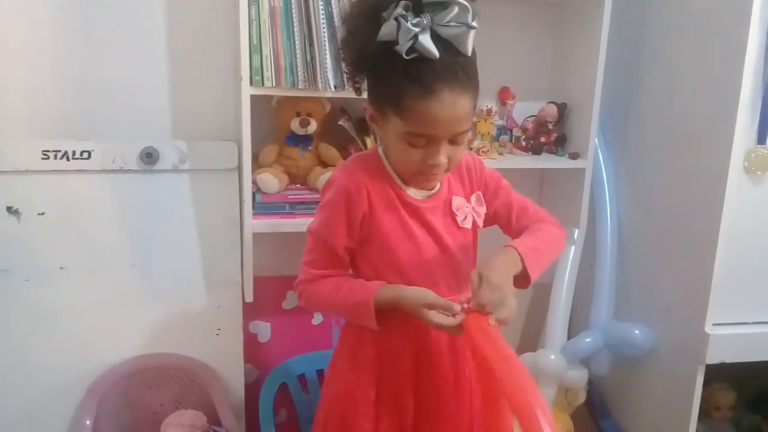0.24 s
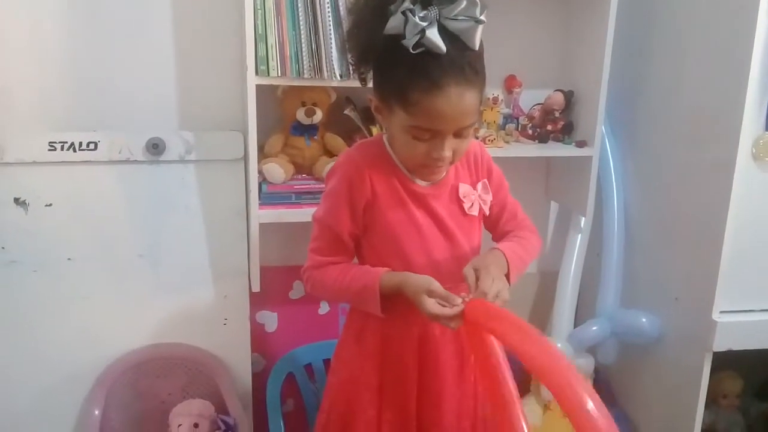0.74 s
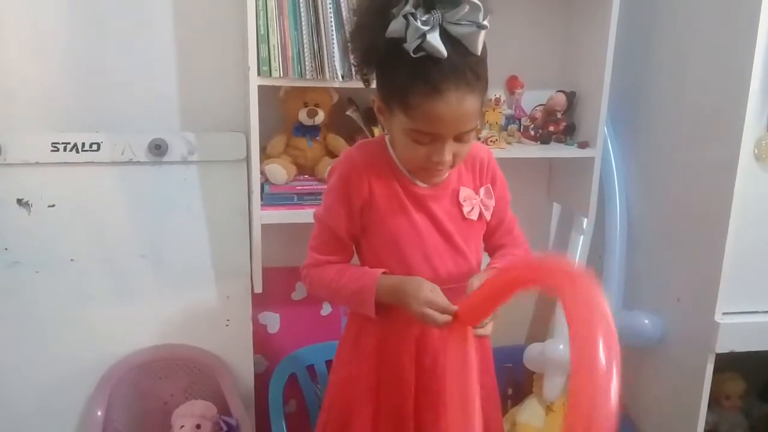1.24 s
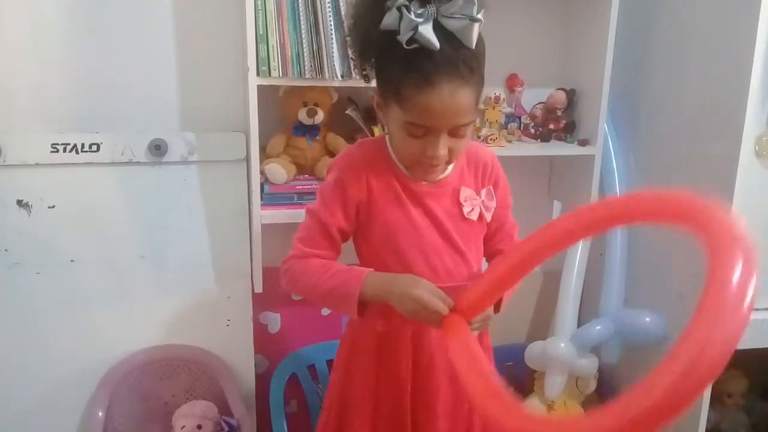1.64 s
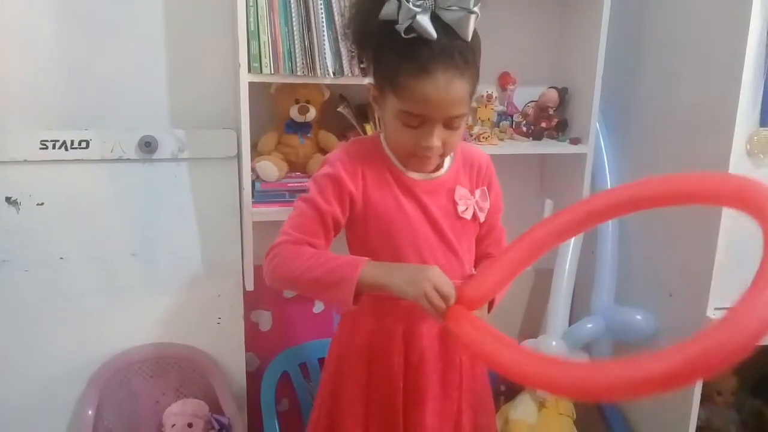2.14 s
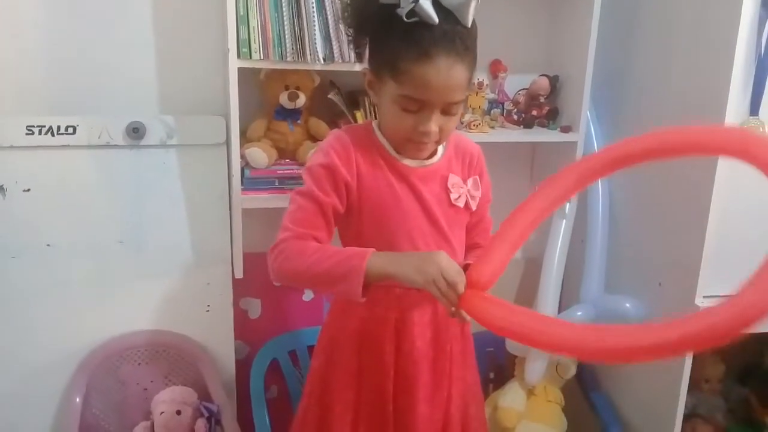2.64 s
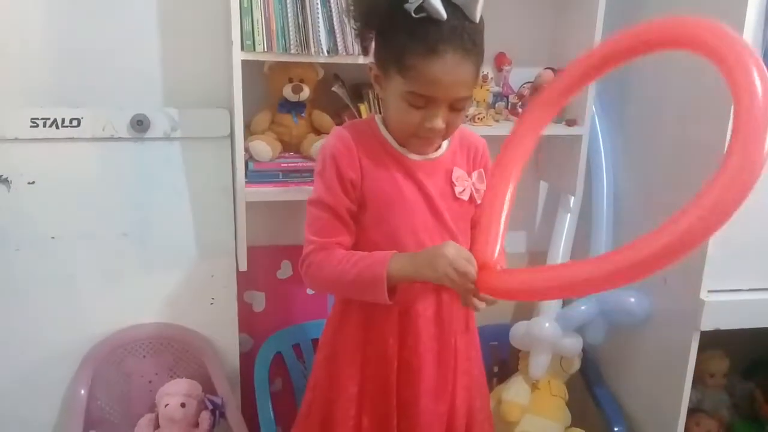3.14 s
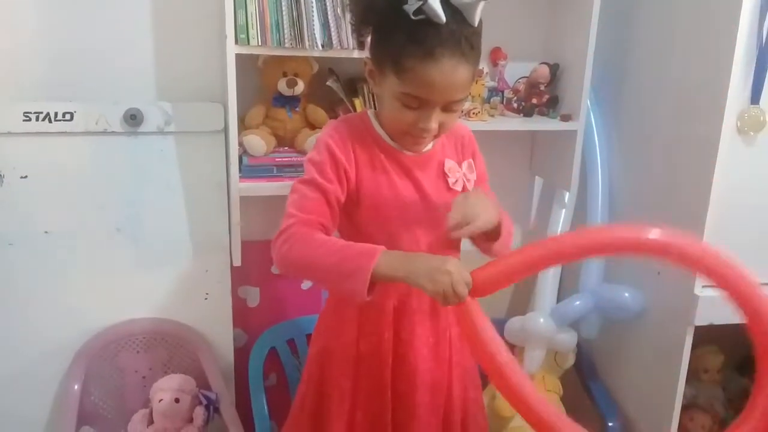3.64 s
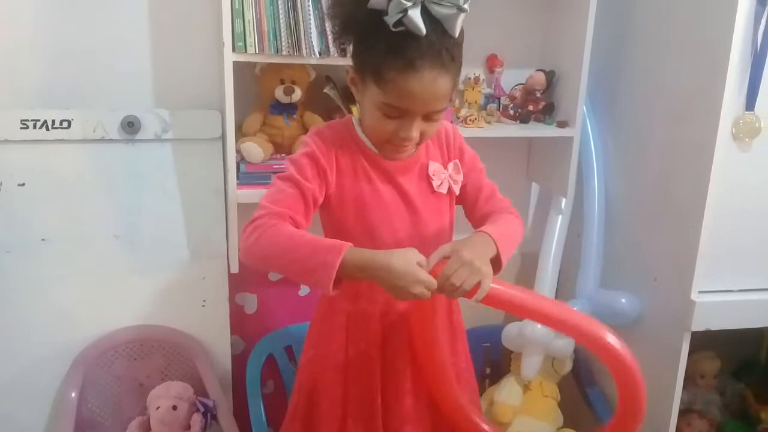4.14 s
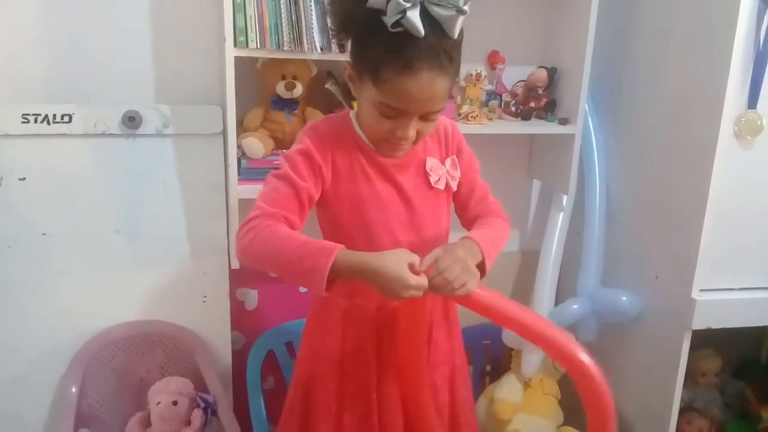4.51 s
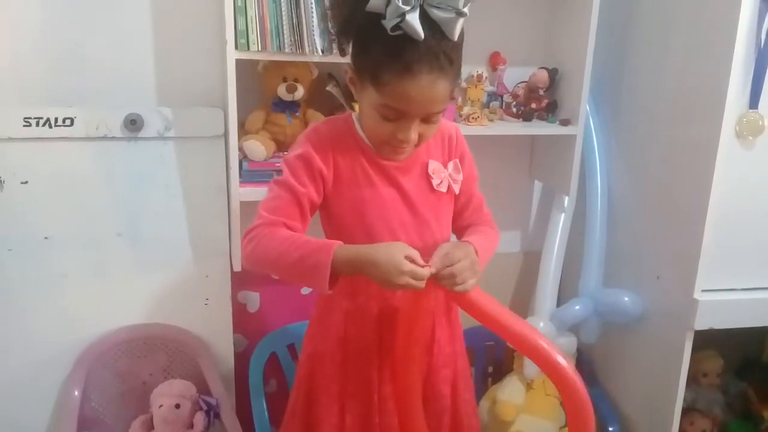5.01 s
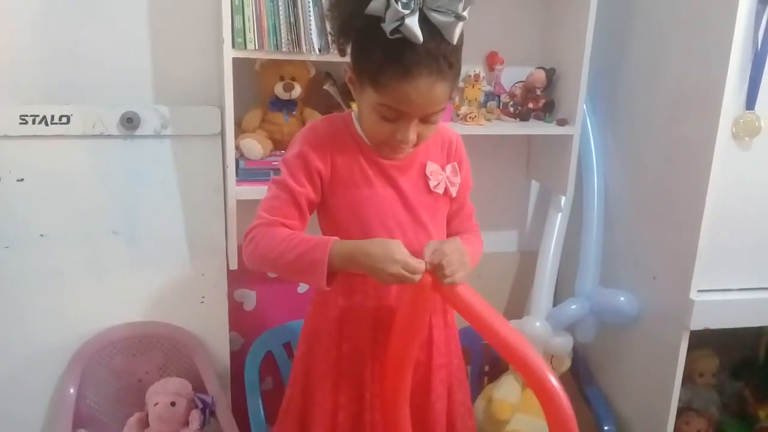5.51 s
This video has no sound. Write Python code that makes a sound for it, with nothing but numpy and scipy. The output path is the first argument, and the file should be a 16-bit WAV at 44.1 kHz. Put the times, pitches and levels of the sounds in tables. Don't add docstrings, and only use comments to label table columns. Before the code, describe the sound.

Stretched latex crackles and groans under twisting hands in a small room, thinning after three seconds to faint dry rubbing and a few small clicks.

```python
import sys
import numpy as np
from scipy import signal
from scipy.fft import rfft, irfft
from scipy.io import wavfile
from scipy.ndimage import uniform_filter1d

SR = 44100
rng = np.random.default_rng(int(sys.argv[2]) if len(sys.argv) > 2 else 0)


def field_ratio(decibels):
    return 10 ** (np.asarray(decibels, dtype=float) / 20)


def master_out(mix):
    frames = np.transpose(np.atleast_2d(mix))
    ceiling = np.clip(frames, -1, 1)
    pcm = np.round(ceiling * 32767).astype(np.int16)
    wavfile.write(sys.argv[1], SR, pcm)


N = 254155


def level(x, db):
    return x * field_ratio(db) / np.sqrt(np.mean(x ** 2))


def ring(x, hz, width):
    return signal.lfilter(*signal.iirpeak(hz, hz / width, fs=SR), x)


def steep(x, modes):
    out = np.zeros(len(x))
    for k, (hz, width, db) in enumerate(modes):
        out += (-1) ** k * field_ratio(db) * ring(ring(x, hz, width), hz, width)
    return out


def flutter(rate, db):
    k = int(SR / rate)
    steps = np.repeat(rng.standard_normal(N // k + 1), k)
    return field_ratio(db * uniform_filter1d(steps, k)[:N])


def effort(table, rise_db_s, sag_db_s, fall_db_s, column=None):
    t = np.arange(0, N + 64, 64) / SR
    gain = 1e-9
    for row in table:
        late = t - row[0]
        release = fall_db_s * np.maximum(late - row[1], 0)
        db = np.where(late < 0, rise_db_s * late, -sag_db_s * late - release)
        offset_db = row[column] if column else 0
        gain = gain + field_ratio(np.maximum(db, -200) + row[2] + offset_db)
    return np.interp(np.arange(N) / SR, t, 20 * np.log10(gain))


def pluck(hz, late_s, cycles):
    t = np.arange(400) / SR - late_s
    spread = np.where(t < 0, cycles, 1.87 * cycles)
    return -np.cos(2 * np.pi * hz * t) * np.exp(-(t * hz / spread) ** 2)


# start_s, skin_db, body_db (against skin), crack_db (against skin)
KNOCKS = [(.9536, -53, 13, -17), (.9895, -56, 5, -24), (1.145, -29, -8, -18), (1.2833, -42, 20, -11),
          (1.3257, -36, 10, -21), (1.3422, -32, 7, -25), (1.5486, -37, 1, -22), (1.6063, -32, 4, -26),
          (1.6193, -33, 3, -32), (2.4633, -40, -9, -14), (3.1447, -48, -2, -24), (3.323, -47, 0, -17),
          (3.3442, -49, 10, -20), (3.3575, -49, 10, -22), (3.8565, -67, 10, -9), (5.732, -44, -23, -18),
          (1.259, -37, 16, -20), (1.2625, -39, 15, -20), (1.2735, -40, 15, -20), (1.3008, -39, 14, -20),
          (1.317, -38, 12, -20), (3.0125, -51, 5, -28), (3.063, -55, 10, -26), (3.163, -56, 10, -26),
          (3.272, -58, 8, -26), (3.3307, -52, 10, -22), (3.3373, -50, 11, -22)]
POPS = [(.1216, -44, 9, -24), (.1298, -33, 4, -23), (.1478, -30, 8, -17), (.1569, -26, -1, -21),
        (.1739, -25, 0, -16), (.1835, -24, 1, -15), (.2009, -24, -2, -14), (.2223, -23, 0, -13),
        (.243, -26, 3, -11), (.262, -39, 17, -11), (.2818, -26, -2, -9), (.3844, -33, 8, -9),
        (.5567, -55, 12, -15), (.656, -49, 10, -12), (.8428, -40, 13, -12), (1.0685, -55, 4, -8),
        (1.1757, -24, 3, -20), (1.2123, -28, 11, -14), (1.2347, -33, 14, -10), (1.536, -34, -1, -14),
        (1.7962, -38, -3, -25), (2.3279, -35, 9, -18), (2.3369, -35, 9, -19), (2.4419, -42, -6, -11),
        (2.9483, -47, 1, -25), (1.4538, -23, -3, -25), (3.0438, -41, 7, -34), (2.9889, -44, 4, -32),
        (3.0998, -35, 1, -33), (3.7236, -63, 10, -16), (3.9273, -43, 0, -31), (4.0427, -46, -2, -16),
        (.1925, -36, 12, -20), (.2105, -36, 11, -18), (.2335, -36, 11, -18), (.2555, -37, 11, -16),
        (.292, -39, 11, -12), (1.222, -33, 11, -20), (1.2485, -33, 12, -18), (1.994, -54, -2, -20),
        (2.648, -40, 10, -18), (.6797, -42, 0, -10), (.691, -41, 0, -12)]
CLICKS = [(.1663, -23, -6, -16), (.4051, -30, 7, -11), (.8125, -42, 4, -4), (1.1374, -30, 3, -33),
          (1.1968, -28, 9, -19), (1.5078, -26, -1, -25), (1.7395, -26, 1, -26), (2.0525, -34, -2, -5),
          (2.079, -41, 1, -10), (2.1312, -37, 1, -11), (2.1859, -50, -1, -18), (2.3046, -42, 5, -23),
          (2.3172, -37, 7, -19), (2.3435, -40, 13, -22), (2.4885, -40, -5, -10), (2.5345, -46, 8, -13),
          (2.5599, -37, 8, -15), (2.5985, -37, 5, -13), (2.619, -27, 6, -15), (2.9656, -57, 10, -17),
          (3.2388, -48, 0, -30), (4.7476, -44, 5, -12)]
TICKS = [(.3911, -24, -3, -23), (.8255, -33, 7, -12), (1.2398, -38, 17, -14), (1.3808, -46, 2, -24),
         (1.4676, -36, 1, -23), (1.5224, -30, 4, -25), (1.573, -31, -2, -15), (1.5936, -33, 7, -21),
         (1.6906, -32, 6, -21), (1.7135, -37, 6, -17), (1.7218, -27, -3, -26), (1.7312, -32, -2, -28),
         (1.7446, -24, -3, -21), (1.7506, -23, -1, -22), (1.761, -31, 4, -14), (2.5052, -38, -2, -19),
         (2.5689, -39, 4, -15), (2.6911, -34, -6, -11), (2.7402, -38, -1, -22), (3.232, -40, 1, -21),
         (3.3043, -35, 0, -15), (3.9366, -48, -3, -29), (4.0164, -56, -1, -24)]
FLICKS = [
    (1.9408, -38, -22, -17),
    (1.9625, -37, -26, -19),
    (2.0461, -34, -22, -19),
]
BODY_HZ = [1130, 1743, 2210, 2350]


def snaps(*groups):
    crack_hz, thud_hz, wall_late_s, skin_top_hz = 10800, 600, .0007, 8400
    dull, sharp = np.zeros(N + 700), np.zeros(N + 700)
    air_db = np.minimum(wringing()[1], 4)
    for rows, wall_hz in zip(groups, BODY_HZ):
        for start_s, skin_db, body_db, crack_db in rows:
            chance = rng.random(5)
            skin_hz = (5900 + 45 * crack_db) * (1 + 0.2 * (chance[3] - .5))
            body_hz = wall_hz * (.92 + .2 * chance[4])
            push = np.zeros(64)
            push[0] = 1
            push[int(22 + 40 * chance[0])] = .15 + .4 * chance[1]
            start = int(start_s * SR)
            at = slice(start, start + 463)
            thud_db = body_db + air_db[start] - 4.0
            flick = field_ratio(3) * pluck(skin_hz, .0003, .8)
            flick += field_ratio(body_db + 3.5) * pluck(body_hz, wall_late_s, .5)
            flick += field_ratio(thud_db) * pluck(thud_hz * (0.92 + 0.55 * chance[2]), 1.37 * wall_late_s, 0.53)
            crack = pluck(crack_hz, .0002, .9)
            dull[at] += field_ratio(skin_db) * np.convolve(flick, push)
            sharp[at] += field_ratio(skin_db + crack_db + 6) * np.convolve(crack, push)
    dull = signal.sosfilt(signal.butter(6, skin_top_hz, fs=SR, output="sos"), dull)
    return (dull + sharp)[:N]


def chatter():
    crowd_db, regrip_db_s, grip_db = 3.5, 800, -4.5
    t = np.arange(N) / SR
    at = np.sort([0] + [row[0] for row in KNOCKS + POPS + CLICKS + TICKS])
    since_s = t - at[np.searchsorted(at, t, side="right") - 1]
    return field_ratio(np.maximum(crowd_db - regrip_db_s * since_s, grip_db))


# start_s (full force), hold_s, creak_db, boom_db and sheen_db (against creak)
WRINGS = [(0.002, 0.023, -51, -9, -24.5), (.025, 0.0095, -44.5, -23, -28), (.132, 0.0056, -34.5, -14, -41),
          (.149, 0.14, -28, -15, -21.5), (.39, 0.018, -30.5, -13, -18), (.44, 0.28, -50.5, 3.5, -34),
          (.645, .005, -53, 0, -9), (.66, 0.027, -43, 2.5, -9.5), (.828, 0.0015, -32, 0, -21.5),
          (1.07, 0.0061, -53.5, 2.5, -22.5), (1.139, 0.012, -36.5, 0, -22),
          (1.177, 0.023, -33, -0.5, -24.5), (1.215, 0.12, -30.5, -3, -33.5),
          (1.456, 0.018, -35.5, -0.5, -24), (1.505, 0.14, -40.5, -5, -22.5),
          (1.695, 0.033, -33.5, -18, -31.5), (1.735, 0.016, -37.5, -2.5, -20.5),
          (1.88, 0.15, -64, 3.5, -12), (2.06, 0.033, -46, -18, -10.5), (2.32, 0.039, -36, -5.5, -24),
          (2.4, 0.036, -51.5, 1.5, -19.5), (2.465, 0.082, -46.5, -3, -18), (2.561, 0.034, -38, -7.5, -26),
          (2.625, 0.011, -30, -8.5, -20.5), (2.97, 0.023, -46, -6.5, -36), (3.05, 0.0073, -46, 3.5, -47),
          (3.105, 0.023, -45, -3, -29), (3.24, 0.015, -44, -18, -24), (3.33, 0.032, -46, 1.5, -27),
          (3.87, 0.02, -53, 7, -56), (3.95, 0.006, -52.5, -23, -17)]


def wringing():
    rise_db_s, sag_db_s = 1484, 45.5
    creak_db = effort(WRINGS, rise_db_s, sag_db_s, 270)
    boom_db = effort(WRINGS, rise_db_s, sag_db_s, 178, column=3)
    sheen_db = effort(WRINGS, rise_db_s, sag_db_s, 180, column=4)
    return creak_db, boom_db - creak_db, sheen_db - creak_db


# pitch_hz, width_hz, level_db
COLUMN = [(135, 31, 9.5), (200, 49, 0.5), (295, 283, -0.5), (404, 178, -2.5), (652, 342, 4.5)]
CREAK = [(920, 640, 0.5), (1466, 590, -1.5), (2395, 1710, 2)]
TAUT = [(3470, 1900, 2), (5270, 3300, -5), (7020, 2100, -9.5)]
SHEEN = [(8060, 3150, -1.5), (10540, 660, 6), (10800, 9500, -1), (15700, 690, -13)]


def rubbing():
    creak_db, boom_db, sheen_db = wringing()
    strength_db = 2.6 * np.minimum(rng.exponential(size=N), 3)
    slips = (rng.random(N) < 700 / SR) * field_ratio(strength_db)
    grit = level(slips - slips.mean(), 0) + field_ratio(-10) * rng.standard_normal(N)
    upper = field_ratio(0.05 * (np.clip(sheen_db, -45, -12) + 18.5))
    wall = steep(grit, CREAK[:2]) + steep(grit, CREAK[2:]) * upper
    taut = level(steep(grit, TAUT), -12.5) * field_ratio(0.52 * (sheen_db + 14.5))
    creak = level(wall, -9) + taut
    boom = level(steep(grit, COLUMN), -10) * field_ratio(boom_db)
    sheen = level(steep(grit + rng.standard_normal(N), SHEEN), -1.86) * field_ratio(sheen_db)
    return field_ratio(creak_db) * chatter() * flutter(60, 1.3) * (creak + boom + sheen)


# (start_s at full force, hold_s, level_db)
SINGS = [
    (1167, [(1.39, .05, -54), (1.87, .06, -67), (2.715, .02, -56), (2.76, .03, -58), (3.19, .03, -66), (3.345, .05, -51), (3.41, .03, -52), (3.475, .025, -65)]),
    (2185, [(2.36, .06, -56), (2.63, .085, -51), (2.79, .04, -71)]),
    (118, [(.31, .04, -55), (.37, .05, -50), (.46, .08, -56)]),
    (282, [(.4, .06, -54), (.52, .09, -62)]),
    (186, [(.45, .1, -59), (.67, .035, -44), (.75, .05, -52), (.92, .06, -55)]),
    (318, [(.84, .07, -52), (.96, .04, -60)]),
    (665, [(4.405, .05, -60)]),
]


def singing():
    t = np.arange(N) / SR
    out = np.zeros(N)
    for hz, strokes in SINGS:
        force = field_ratio(effort(strokes, 900, 40, 380))
        out += force * np.sin(2 * np.pi * hz * t) * flutter(40, 1.8)
    return out


def burst(hz, width, push):
    y = np.pad(push, (0, 6000))
    for _ in range(3):
        y = ring(y, hz, width)
    return y / np.abs(y).max()


# start_s,
# pitch_hz, width_hz, level_db (peak), push_s
SHOVES = [(0.15, 113, 35.8, -42.5, 0.052), (.285, 118, 49, -51, .02), (.82, 196, 60, -38, 0.008),
          (1.235, 295, 46, -39, .03), (1.44, 114, 50, -51, 0.01), (1.52, 124, 50, -49, .03),
          (0.656, 186, 60.4, -36.5, 0.0039), (1.225, 188, 55, -34, 0.011), (0.39, 219, 138, -47, 0.14),
          (1.16, 190, 45.7, -33.5, 0.04), (4.09, 139, 80, -60, .02), (4.17, 131, 80, -59, 0.025),
          (4.15, 690, 500, -52, 0.035), (4.59, 890, 350, -55, 0.026), (4.8, 800, 400, -55, .06),
          (3.399, 355, 150, -71, 0.025), (3.726, 2110, 1050, -53, 0.034), (4.085, 624, 690, -45, 0.023),
          (4.246, 806, 300, -47, 0.0072), (4.393, 735, 590, -44.5, 0.014), (4.42, 900, 890, -41, 0.0078),
          (4.42, 1970, 900, -45, 0.0076), (4.76, 1520, 1120, -32.5, 0.0017),
          (4.768, 1500, 2300, -56, 0.0025), (5.031, 195, 49.4, -60.5, 0.0067),
          (5.455, 2430, 500, -59, 0.037), (3.929, 2380, 1500, -41, 0.029), (5.713, 5400, 1200, -48, 0.11),
          (.4, 2190, 40, -40, .01),
          (5.445, 5140, 2400, -59.5, .04), (5.555, 5600, 1400, -58, 0.085),
           (3.47, 4000, 3600, -63.5, 0.11), (1.3, 1370, 500, -65, 0.04), (.384, 2260, 1000, -28.5, 0.032),
           (1.74, 2700, 1700, -27.5, 0.013), (.826, 1400, 1600, -29.5, 0.024), (3.1, 1200, 1600, -49, 0.03),
           (2.99, 1700, 3000, -46, 0.035), (4.748, 1900, 1800, -35.5, 0.012), (3.865, 470, 300, -56, .03),
           (3.94, 107, 80, -54, .03), (0.58, 1140, 240, -44, 0.045), (1.18, 1500, 820, -37, .03),
           (4.94, 800, 300, -54, .03)]


def bumps():
    dull = np.zeros(N)
    t = np.arange(3200) / SR
    for start_s, hz, width, db, push_s in SHOVES:
        start = int(start_s * SR)
        shove = rng.standard_normal(3200) * np.exp(-t / push_s)
        bump = burst(hz, width, shove)[:N - start]
        dull[start:start + len(bump)] += field_ratio(db) * bump
    return dull


# start_s (full force), hold_s, rub_db, boom_db and sheen_db (against rub)
PULLS = [(4.06, 0.018, -62, 1, -7), (4.12, 0.042, -61, 5, -5), (4.25, 0.053, -55.5, -16, -7.5),
         (4.31, 0.045, -58, -35, 2), (4.39, 0.042, -55.5, -0.5, -1), (4.49, 0.087, -54, -11, 0.5),
         (4.765, 0.026, -49, -31, -3.5), (4.86, 0.071, -61, -5.5, -7.5), (4.95, 0.0026, -56, -9, -3.5),
         (5.05, 0.0061, -74, 14, -8), (5.11, 0.003, -55, -29, -2.5), (5.19, 0.046, -60, -26, -7.5),
         (5.26, 0.0052, -62.5, -23, -1.5), (5.35, 0.017, -73, -6, -8.5), (5.47, 0.0079, -76.5, -13, -4),
         (5.58, 0.071, -64, -11, -5.5), (5.75, .02, -63, -10, -3)]
# pitch_hz, width_hz, level_db
SLIDE = [(4160, 2060, -5), (5630, 980, -0.5)]


def knotting():
    pull = PULLS, 305, 32, 295
    rub_db = effort(*pull)
    boom_db = effort(*pull, column=3)
    sheen_db = effort(*pull, column=4)
    hiss = rng.standard_normal(N) * flutter(70, 2.2) * flutter(23, 0.33)
    loose = field_ratio(0.1 * np.clip(boom_db - rub_db + 7.5, -15, 8))
    skin = steep(hiss, [(1500, 2830, -1.3)]) * loose - steep(hiss, [(2400, 1010, 5.6)])
    rub = level(skin, -4.5) * field_ratio(rub_db)
    boom = level(steep(hiss, COLUMN), -7.0) * field_ratio(boom_db)
    sheen_share = 0.34
    slide_db = sheen_share * sheen_db + (1 - sheen_share) * rub_db
    slide = level(steep(hiss, SLIDE), -0.5) * field_ratio(slide_db)
    sheen = level(steep(hiss, SHEEN), 0.5) * field_ratio(sheen_db)
    return rub + boom + slide + sheen


# pitch_hz, t60_s, level_db
ROOM = [(370, 0.38, -6.5), (1510, 0.31, 0), (3500, 0.26, 1), (7600, 0.074, -24), (12160, 0.26, -1)]
# pitch_hz, t60_s, level_db
RINGS = [(117.3, 0.99, -62), (184.7, 0.34, -58), (199, 0.45, -59), (305, 0.38, -55.5), (683, 0.21, -68),
         (1188, 0.4, -45), (1232, 0.21, -54), (2245, .3, -49), (2260, 0.095, -44)]


def room(x):
    t = np.arange(SR // 2) / SR
    tones = sum(field_ratio(db - 60 * t / t60) * np.sin(2 * np.pi * hz * t) for hz, t60, db in RINGS)
    out = np.pad(x + signal.fftconvolve(x, tones)[:N], (0, SR))
    first_wall = np.clip((t - .0015) / 0.0003, 0, 1)
    noises, fades = [], []
    for hz, t60, db in ROOM:
        noises.append(level(ring(rng.standard_normal(2 * SR), hz, 0.74 * hz), 0))
        fades.append(field_ratio(db - 34.5 - 60 * t / t60) * first_wall)
    hop = int(.16 * SR)
    padded = np.pad(x, (hop, 2 * hop))
    blend = np.sin(np.pi * np.arange(2 * hop) / (2 * hop))
    for start in range(0, N, hop):
        skip = rng.integers(SR)
        echo = sum(fade * n[skip:skip + len(t)] for fade, n in zip(fades, noises))
        wet = signal.fftconvolve(padded[start:start + 2 * hop] * blend, echo)
        wet = wet[max(hop - start, 0):]
        out[max(start - hop, 0):][:len(wet)] += wet
    return out[:N]


# pitch_hz, level_db (per Hz)
HUSH = [(12, -49), (20, -13.5), (120, 1), (255, -12), (542, -18.5), (759, -15), (1000, -20.5), (1190, -15),
        (1610, -27), (1860, -18.5), (6360, -31), (14700, -31), (16000, -28)]


def hush():
    hz, db = np.transpose(HUSH)
    f = np.arange(N // 2 + 1) * SR / N + 1
    colour = field_ratio(np.interp(np.log(f), np.log(hz), db))
    noise = irfft(rfft(rng.standard_normal(N)) * colour, N)
    return level(noise * flutter(1.65, 0.98), -68.5)


def scene():
    snap = snaps(KNOCKS, POPS, CLICKS, TICKS) + bumps()
    flick = snaps(FLICKS)
    aimed = .6
    to_walls = (1 - aimed) * snap + 0.33 * flick + rubbing() + knotting()
    heard = singing() + aimed * snap + 0.66 * flick + room(to_walls)
    thin = signal.sosfilt(signal.butter(4, 85, "high", fs=SR, output="sos"), heard)
    return (thin + hush())[None]


def top_cut(x):
    return signal.sosfilt(signal.butter(12, 16800, fs=SR, output="sos"), x)


def record(dry):
    port = dry - .35 * ring(dry, 3300, 450)
    top = signal.sosfiltfilt(signal.butter(24, 15900, fs=SR, output="sos"), port)
    mix = top + field_ratio(-30) * (port - top)
    return top_cut(mix)


dry = scene()
out = record(dry)
master_out(out)
```